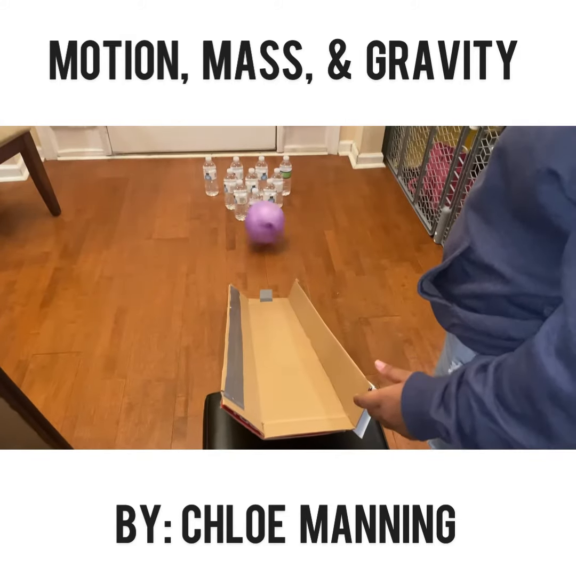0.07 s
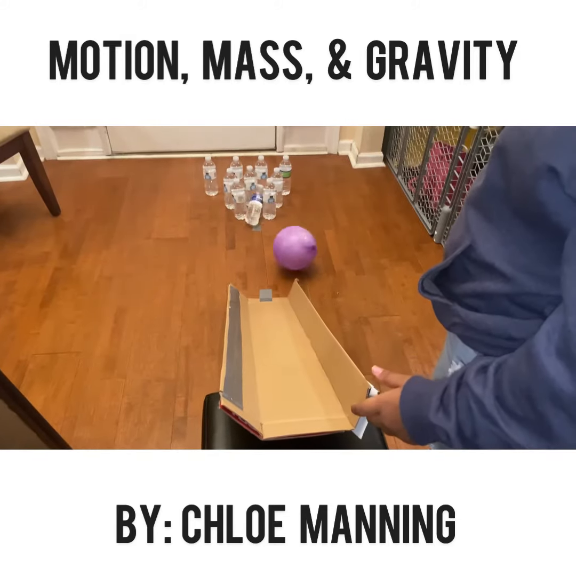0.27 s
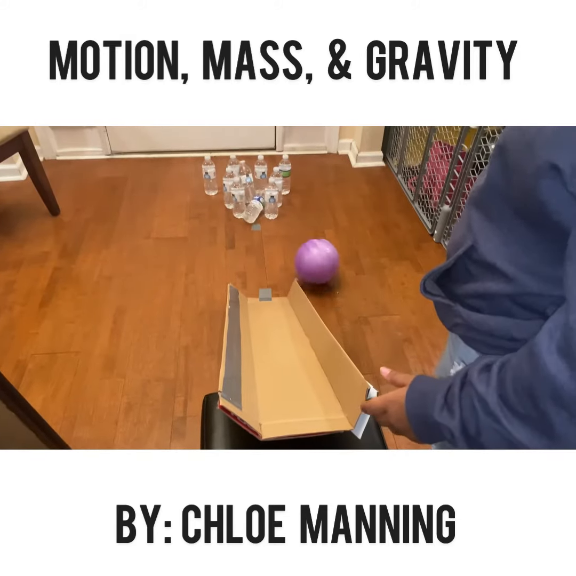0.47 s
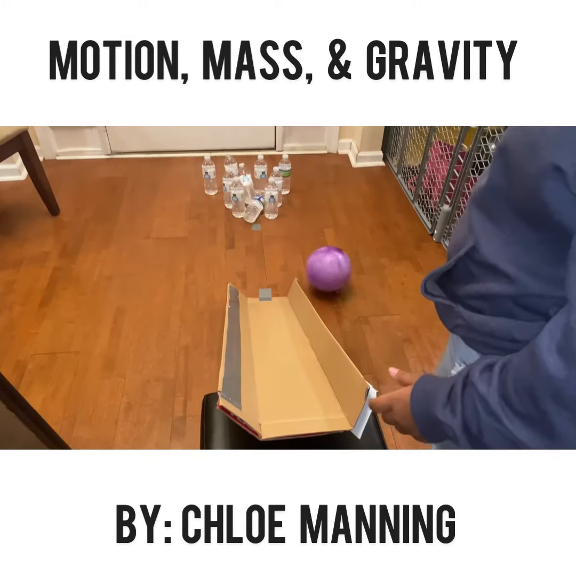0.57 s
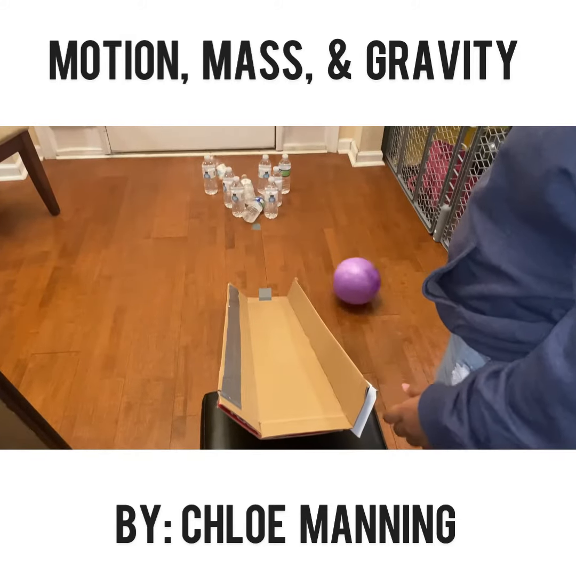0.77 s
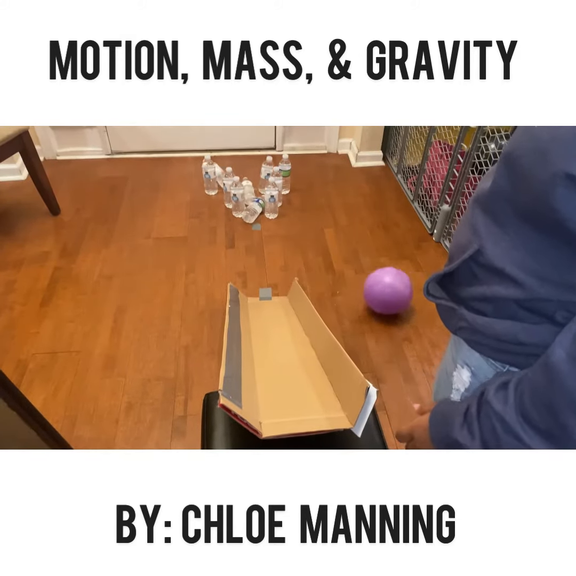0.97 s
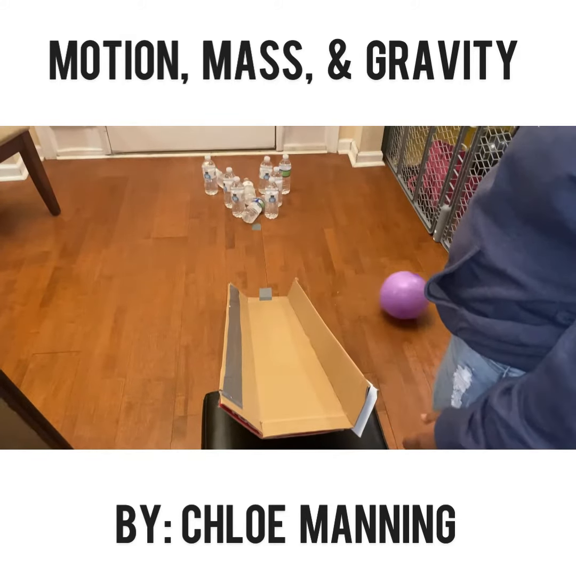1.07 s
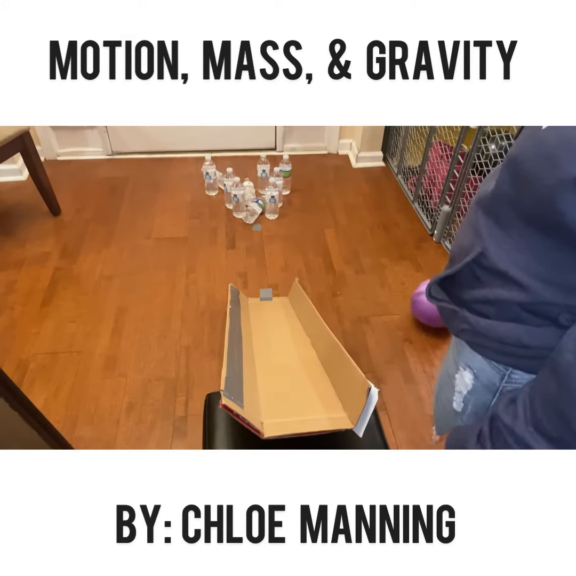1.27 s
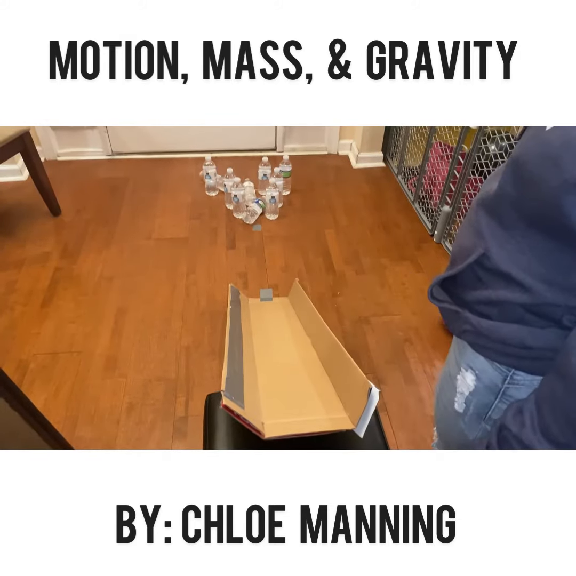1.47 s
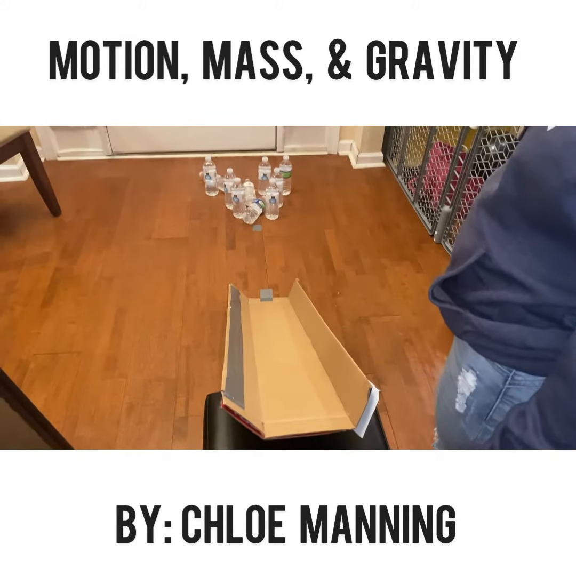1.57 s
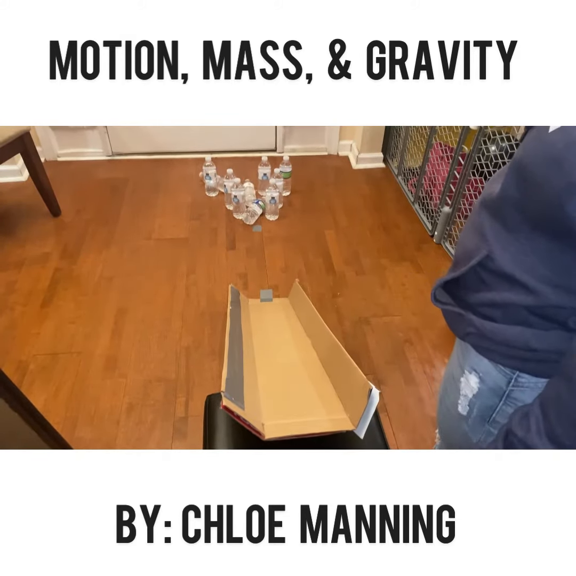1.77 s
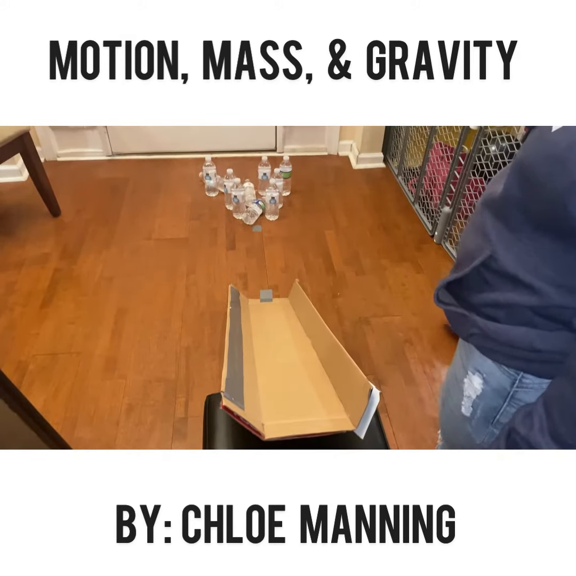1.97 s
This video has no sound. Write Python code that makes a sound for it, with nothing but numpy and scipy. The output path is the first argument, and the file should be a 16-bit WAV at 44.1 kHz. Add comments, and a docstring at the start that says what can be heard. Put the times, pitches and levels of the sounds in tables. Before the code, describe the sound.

Hollow, crackly plastic bottle knocks tumble in quick uneven succession over a low ball rumble in a reverberant room, heard from a few metres; they thin out to soft nearby taps, brief silence, then steady room noise.

```python
"""Ball among plastic bottles

A ball ploughs into a group of thin plastic bottles on a wooden floor, a few metres away in a live room.
Bursts of tiny buckles excite the modes of the bottles' shells; single modes and low hums ring on.
Low filtered noise makes the ball's thumps and its roll over the boards. Near the end come soft taps
close by, shaped from short noise bursts, and a brief silence, after which the room noise is louder."""
import sys
import numpy as np
from scipy import signal
from scipy.fft import rfft, irfft
from scipy.io import wavfile

SR = 44100
rng = np.random.default_rng(int(sys.argv[2]) if len(sys.argv) > 2 else 0)


def wrap_up_sound(samples):
    """Save the sound to the file named by the first command line argument, as 16-bit audio."""
    columns = np.atleast_2d(samples).T
    # keep every value between -1 and 1, then stretch to whole-number steps
    tamed = np.clip(columns, -1, 1)
    steps = np.round(tamed * 32767).astype(np.int16)
    wavfile.write(sys.argv[1], SR, steps)


N = 89655
LEAD_S, LEVEL_WINDOW_S = 0.1, 0.01
TOP_HZ = 16200


def undb(db):
    """Decibel definition: amplitude gain is 10 to the power dB / 20."""
    return 10 ** (np.asarray(db) / 20)


def curve(points, hz):
    """Logarithmic frequency scale: interpolate a (freq_hz, value) table along it."""
    table = np.array(points, float)
    return np.interp(np.log(np.maximum(hz, 1)), np.log(table[:, 0]), table[:, 1])


def freqs(size):
    """Discrete Fourier transform: the frequencies of its bins in Hz."""
    return np.arange(size // 2 + 1) * SR / size


def colour(x, points):
    """Minimum phase: folding the cepstrum gives a causal filter of the given (freq_hz, shape_db)."""
    size = 2 * x.shape[-1]
    cepstrum = irfft(np.log(undb(curve(points, freqs(size)))))
    cepstrum[1:size // 2] *= 2
    cepstrum[size // 2 + 1:] = 0
    response = np.exp(rfft(cepstrum))
    return irfft(rfft(x, size) * response)[..., :size // 2]


def band(x, hz, kind, order=3):
    """Butterworth filtering: a maximally flat pass band."""
    edges = np.minimum(hz, SR / 2 - 100)
    return signal.sosfilt(signal.butter(order, edges, kind, fs=SR, output="sos"), x)


def strength(x, db):
    """Energy level: scale a short sound by its whole energy, counted over the level window."""
    rms = np.sqrt(np.sum(x ** 2) / (LEVEL_WINDOW_S * SR))
    return x * undb(db) / rms


def add(track, s, x):
    """Superposition: mix a sound into a track that starts LEAD_S before time zero."""
    i = max(int((s + LEAD_S) * SR), 0)
    track[..., i:i + x.shape[-1]] += x[..., :track.shape[-1] - i]


def ring(t, hz, t60):
    """Damped mode: a cosine that decays exponentially by 60 dB in t60 seconds."""
    return np.cos(2 * np.pi * hz * t) * np.exp(-np.log(1000) * t / t60)


def wash(points, db, side_share):
    """Mid and side noise: steady stereo noise, alike at both ears except for its side share."""
    mid, side = colour(rng.standard_normal((2, N)), points)
    x = mid + side_share * side * np.array([[1], [-1]])
    return x * undb(db) / x.std()


# reverberation time of the room: freq_hz, t60_s
ROOM_DECAY = [(150, 1), (400, 0.57), (1000, 0.51), (9000, 0.45), (15000, 0.13)]
# likeness of left and right in the room: freq_hz, correlation (no unit)
EAR_LIKENESS = [(200, 0.81), (1000, 0.3), (2000, 0.039), (13000, -0.03)]
TAIL_DB, TAIL_BUILD_S = -0.5, 0.0027
EARLY_DB, EARLY_S = -5, 0.012  # extra scatter from the nearby floor and walls


def tails(count, size=24576):
    """Diffuse reverberation: dense noise whose bands decay at their own rates, new for every spot."""
    t, hz = np.arange(size) / SR, freqs(size)
    noise = rng.standard_normal((count, 2, 1, size)).astype("float32")
    mid, side = rfft(noise).swapaxes(0, 1)
    alike = np.clip(curve(EAR_LIKENESS, hz), -1, 1)
    opposite = np.array([[1], [-1]]) * side
    both = (mid * np.sqrt(1 + alike) + opposite * np.sqrt(1 - alike)) / np.sqrt(2)
    build = 1 - np.exp(-t / TAIL_BUILD_S)
    early = 1 + undb(EARLY_DB) * np.exp(-t / EARLY_S)
    out = 0
    for k, (_, t60) in enumerate(ROOM_DECAY):
        # each band fades in and out between its neighbours' frequencies
        share = curve([(f, j == k) for j, (f, _) in enumerate(ROOM_DECAY)], hz)
        fade = np.exp(-np.log(1000) * t / t60) * build * early
        band_noise = irfft((both * share).astype("complex64"), size)
        out = out + band_noise * (fade / np.linalg.norm(fade))
    return out * undb(TAIL_DB)


# first reflections: shortest delay_ms, level_db
FIRST_REFLECTIONS = [(3.3, -13.5), (8.7, -12), (12, -21.5)]
DIRECT_DB, RIGHT_LAG_S = -9.5, 0.00011


def in_room(sharp, spread, tail):
    """Direct and diffuse fields: sharp sound comes directly and by reflections, the rest as the tail."""
    out = signal.fftconvolve(spread[None], tail, axes=1)
    for ear, lag in zip(out, (0, int(round(RIGHT_LAG_S * SR)))):
        ear[lag:lag + len(sharp)] += undb(DIRECT_DB) * sharp
        for ms, db in FIRST_REFLECTIONS:
            i = int(ms / 1000 * SR * (1 + 0.14 * rng.random()))  # up to 14 % later, drawn per ear
            ear[i:i + len(sharp)] += undb(db) * sharp
    return out


# left-to-right balance of the bottles: freq_hz, left_minus_right_db
BOTTLE_BALANCE = [(200, -1), (700, 4.5), (2100, -2), (3500, 0)]


def balanced(track):
    """Interaural level difference: half is added at the left and half taken from the right."""
    size = track.shape[-1]
    tilt = curve(BOTTLE_BALANCE, freqs(size)) / 2
    return irfft(rfft(track) * undb([tilt, -tilt]), size)


# nominal modes of a bottle's shell, before colouring: pitch_hz, level_db, t60_s
SHELL_MODES = [(867, -9, 0.017), (1280, -4, 0.068), (2158, -8.5, 0.0053), (4170, 7, 0.0071),
               (4760, -4, 0.002), (6360, 4, 0.01), (10480, 7, .0028)]
# spectral shape of shell and crack: freq_hz, shape_db
SHELL_COLOUR = [(88, -30.5), (150, -10), (439, -4), (601, -10.5), (2100, -6.5), (3290, -9.5), (4950, -4),
                (9080, -17), (10800, -16.5), (13400, -20), (16000, -23)]
SIZE_SPREAD, CRACK_DB = 0.085, 14.5  # relative spread of mode pitch; level of the dry crack


def shell(t):
    """Modal superposition: damped shell modes and a dry crack, each mode retuned a little every knock."""
    modes = 0
    for hz, db, t60 in SHELL_MODES:
        tuned_hz = hz * (1 + SIZE_SPREAD * rng.standard_normal())
        modes = modes + strength(ring(t, tuned_hz, t60), db)
    crack = strength(1. * (t == 0), CRACK_DB)
    return colour(modes + crack, SHELL_COLOUR)


BUCKLES_PER_S, BUCKLE_SPREAD_DB = 900, 10
MAIN_BUCKLE = 5  # amplitude before the push shapes it


def crumple(t, ms):
    """Snap-through buckling: random clicks in the plastic that swell with the push and die away."""
    happens = rng.random(len(t)) < BUCKLES_PER_S / SR
    sign = rng.choice([-1, 1], len(t))
    buckles = happens * sign * undb(BUCKLE_SPREAD_DB * rng.random(len(t)))
    buckles[int(ms / 3000 * SR)] = MAIN_BUCKLE  # a third of the way through
    push = t * 1000 / ms
    return buckles * np.sqrt(push) * np.exp(-push ** 2 / 2)


# edges of the body, wall, clack and crackle bands below TOP_HZ: edge_hz
BAND_EDGES_HZ = [130, 700, 2800, 7500]


def voiced(x, levels):
    """Band energies: set the strength of body, wall, clack and crackle separately."""
    edges = BAND_EDGES_HZ + [TOP_HZ]
    out = 0
    for k, db in enumerate(levels):
        out = out + strength(band(x, edges[k:k + 2], "bandpass"), db)
    return out


# bottle knocks, levels before the room: start_s, crumple_ms, body_db, wall_db, clack_db, crackle_db
BOTTLE_KNOCKS = [ (-.03, 5.4, -42, -39.5, -40.5, -43.5), (.125, 3.6, -50, -45, -45, -53),
                 (0.15, 2.9, -49, -38.5, -37, -41), (0.186, 1.43, -50, -41, -37, -42.5),
                 (0.2252, 3.6, -49, -41.5, -63, -38), (.246, 8.2, -32, -27, -29, -36),
                 (0.4143, 2.17, -42.5, -36.5, -32.5, -37.5), (.431, 1.7, -40.5, -78.5, -58, -48),
                 (0.5439, 1.87, -50, -37.5, -33, -41), (.566, 4.7, -39.5, -34.5, -27.5, -34.5),
                 (0.586, .7, -37, -41, -32.5, -33), (.672, 1.4, -54, -43.5, -41, -46),
                 (.709, 1.92, -43.5, -34, -26.5, -32.5), (0.742, 4.2, -34.5, -31.5, -30, -34.5),
                 (0.755, 6.4, -42, -35.5, -30, -44), (.812, 3, -42.5, -35, -33.5, -45),
                 (0.909, 3.9, -63, -51, -45, -58), (0.941, 3, -40, -30, -31, -39.5),
                 (0.956, 1.9, -45, -35, -30, -38.5), (1.091, 5.84, -40, -35, -30.5, -44),
                 (1.21, 20.3, -45, -36, -41, -54), (1.302, 8, -48, -40.5, -44.5, -57),
                 (1.541, 5.8, -71.5, -57, -65.5, -76)]


def knocks(size):
    """Source-filter principle: each crumple excites a shell, which is then heard through the room."""
    t = np.arange(SR // 10) / SR
    track = np.zeros((2, size))
    for (s, ms, *levels), tail in zip(BOTTLE_KNOCKS, tails(count=len(BOTTLE_KNOCKS))):
        body = shell(t)
        crack = signal.fftconvolve(crumple(t, ms), body)[:len(t)]
        add(track, s, in_room(voiced(crack, levels), voiced(body, levels), tail))
    return track


# the ball thumps the boards: start_s, level_db
BALL_THUMPS = [(-.005, -38.5), (0.152, -44.5), (0.757, -45)]
THUMP_HZ, THUMP_S = 59, 0.0082


def thumps(size):
    """Impact force pulse: a short noise push, band-passed low, for the ball on the boards."""
    t = np.arange(SR // 4) / SR
    track = np.zeros((2, size))
    for s, db in BALL_THUMPS:
        push = rng.standard_normal(len(t)) * t * np.exp(-2 * t / THUMP_S)
        low = band(push, [THUMP_HZ / 2, THUMP_HZ * 1.4], "bandpass", order=2)
        add(track, s, strength(low, db))
    return track


# spectral shape of the rolling, before a low-pass: freq_hz, shape_db
ROLL_COLOUR = [(25, -20), (57, 2), (115, -1), (170, -11.5), (1500, -39.5)]
ROLL_DB, ROLL_WOBBLE_DB = -57, 2  # level before low-pass, wobble and fade; wobble's standard deviation
ROLL_FADE_DB_PER_S = 1


def rolling():
    """Random roughness excitation: the ball rumbles unevenly over the boards, fading as it slows."""
    wobble = np.interp(np.arange(N), np.linspace(0, N, 20), rng.standard_normal(20))
    rumble = band(wash(ROLL_COLOUR, ROLL_DB, 0.29), 1200, "lowpass", order=2)
    fade_db = ROLL_FADE_DB_PER_S * (np.arange(N) / SR - 1.0)  # zero at one second
    return rumble * undb(ROLL_WOBBLE_DB * wobble - fade_db)


# spectral shape of the faint hiss: freq_hz, shape_db
AIR_COLOUR = [(1040, -12), (3350, -24), (6650, -26.5), (15000, -46.5)]
AIR_DB, AIR_FADE_DB_PER_S = -70, 12  # the level is that reached at the silence
SILENCE_START_S, SILENCE_END_S, SILENCE_FADE_S = 1.938, 1.983, 0.008


def air():
    """Broadband noise floor: a faint hiss that sinks over the last half second before the silence."""
    to_go = np.clip(SILENCE_START_S - np.arange(N) / SR, 0, .5)
    return wash(AIR_COLOUR, AIR_DB, 1) * undb(AIR_FADE_DB_PER_S * to_go)


# stiff spots of the bottles that ring out at hard contacts: start_s, pitch_hz, level_db
STIFF_CLACKS = [(.248, 741, -33.5), (.249, 1227, -32.5), (.247, 3850, -26), (.252, 2110, -41),
                (.4151, 3844, -26), (.4151, 4870, -31.5), (.545, 1042, -37.5), (.57, 2173, -31.5),
                (.573, 4580, -33), (.71, 2210, -28), (.711, 4400, -30), (.743, 2155, -36), (.744, 827, -38),
                (.811, 4610, -29.5), (.9425, 4900, -29.5), (.944, 4200, -28.5), (1.092, 4250, -48)]
CLACK_CYCLES, CLACK_ROOM_DB = 55, -14  # cycles to decay by 60 dB; extra gain of the room's tail


def clacks(size):
    """Constant loss per cycle: single modes that die away in a fixed number of cycles."""
    t = np.arange(SR // 10) / SR
    track = np.zeros((2, size))
    for (s, hz, db), tail in zip(STIFF_CLACKS, tails(count=len(STIFF_CLACKS))):
        tone = ring(t, hz, CLACK_CYCLES / hz)
        add(track, s, strength(in_room(tone, tone, tail * undb(CLACK_ROOM_DB)), db))
    return track


# low hums lingering in the hollow bottles and the room after a blow: start_s, pitch_hz, level_db
LOW_HUMS = [(.252, 314, -42), (0.253, 222, -45.5), (.252, 425.4, -45.5), (.42, 346, -47),
            (0.432, 155.3, -48.5), (.591, 352.8, -47.5), (.745, 437, -43.5), (.759, 269.4, -44),
            (0.945, 233.8, -51)]
HUM_T60_S, HUM_SPLIT_HZ = 0.78, 11.5  # the split is the smallest, at most twice as wide


def hums(size):
    """Beating of close modes: two neighbouring low resonances build up and decay together."""
    t = np.arange(SR) / SR
    track = np.zeros((2, size))
    for s, hz, db in LOW_HUMS:
        upper_hz = hz + HUM_SPLIT_HZ * (1 + rng.random())
        pair = ring(t, hz, HUM_T60_S) + .5 * ring(t, upper_hz, HUM_T60_S)
        add(track, s, undb(db) * pair * (1 - np.exp(-t / TAIL_BUILD_S)))
    return track


# soft taps and scuffs close by, levels without the room: start_s, length_ms, level_db, dull_above_hz
SOFT_TAPS = [(1.456, 4.4, -53, 576), (1.728, 32, -59.5, 1620), (1.7766, 2.85, -51.5, 12000),
             (1.794, 25, -59, 5000), (1.898, 5.4, -65, 635)]
# spectral shape of the taps: freq_hz, shape_db
TOUCH_COLOUR = [(350, -1.5), (1800, -7), (3500, -24), (9500, -10), (13000, -48.5)]
TAP_ROOM_DB = -10


def taps(size):
    """Near-field contact noise: short soft bursts, mostly direct, with a weaker room tail."""
    t = np.arange(SR // 4) / SR
    track = np.zeros((2, size))
    for (s, ms, db, hz), tail in zip(SOFT_TAPS, tails(count=len(SOFT_TAPS))):
        touch = rng.standard_normal(len(t)) * t * np.exp(-2 * t * 1000 / ms)
        tap = strength(band(colour(touch, TOUCH_COLOUR), [150, hz], "bandpass", order=2), db)
        add(track, s, tap)
        add(track, s, undb(TAP_ROOM_DB) * signal.fftconvolve(tap[None], tail, axes=1))
    return track


# spectral shape of the louder room noise: freq_hz, shape_db
LATE_AIR_COLOUR = [(100, -4.5), (500, -10.5), (850, -7.5), (3430, -28.5), (6650, -28), (14000, -54)]
LATE_AIR_DB = -54.5


def late_air():
    """Stationary noise: the louder, steady room noise heard after the silence."""
    return wash(LATE_AIR_COLOUR, LATE_AIR_DB, 0.43)


def scene():
    """Superposition: bottles, ball, taps and hiss, a brief silence, then louder room noise."""
    t, lead = np.arange(N) / SR, int(LEAD_S * SR)
    size = N + lead
    bottles = balanced(knocks(size) + clacks(size) + hums(size))
    events = (bottles + thumps(size) + taps(size))[:, lead:]
    play = events + rolling() + air()
    before = np.clip((SILENCE_START_S - t) / SILENCE_FADE_S, 0, 1)
    after = np.clip((t - SILENCE_END_S) / SILENCE_FADE_S, 0, 1)
    return play * before + late_air() * after


def record(dry):
    """Band limitation: a steep elliptic low-pass cuts the top."""
    return signal.sosfilt(signal.ellip(8, .2, 70, TOP_HZ, fs=SR, output="sos"), dry)


dry = scene()
out = record(dry)
wrap_up_sound(out)
```